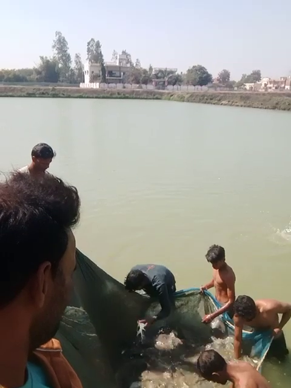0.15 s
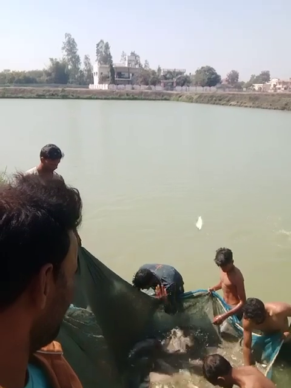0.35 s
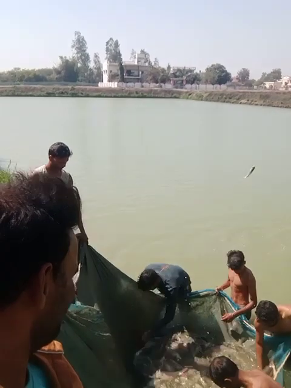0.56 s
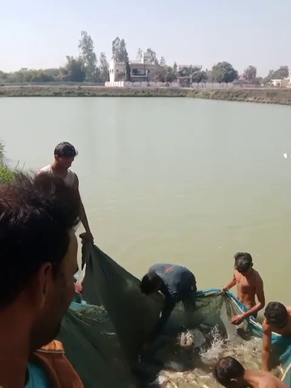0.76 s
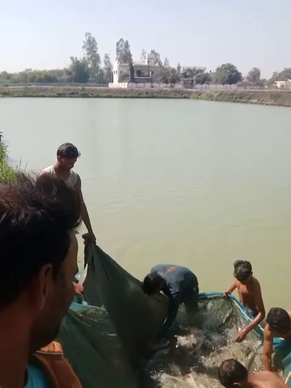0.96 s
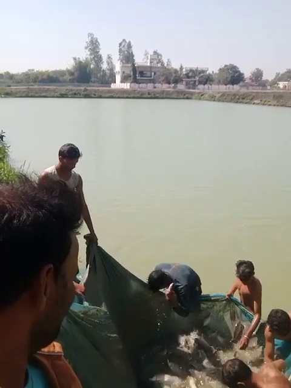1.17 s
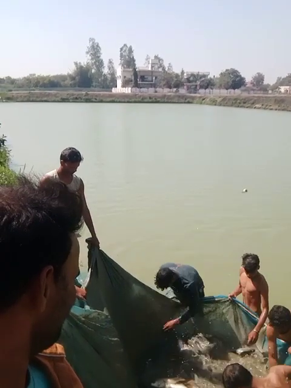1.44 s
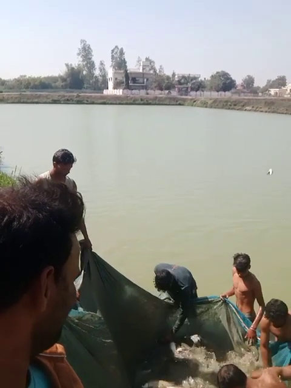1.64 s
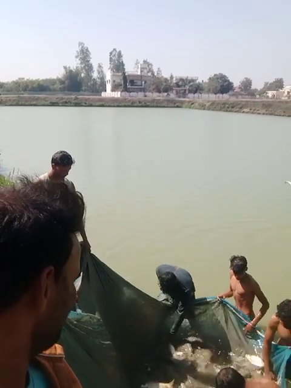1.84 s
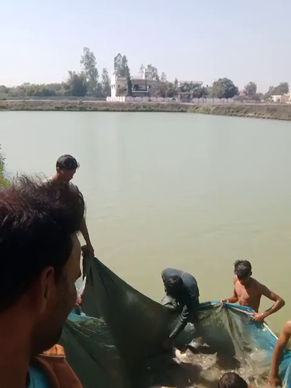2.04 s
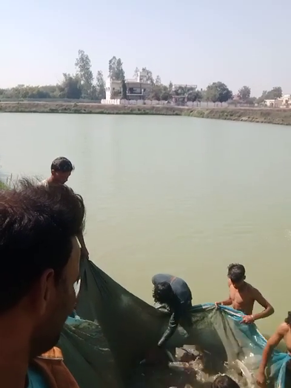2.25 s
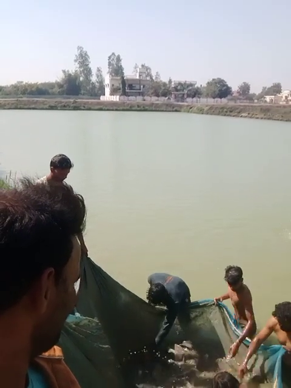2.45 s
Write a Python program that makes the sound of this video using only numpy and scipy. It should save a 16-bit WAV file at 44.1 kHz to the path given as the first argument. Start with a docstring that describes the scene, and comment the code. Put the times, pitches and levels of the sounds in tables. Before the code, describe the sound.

Crowded fish thrash in a net, churning and slapping pond water, with light wind rumbling on the microphone

```python
"""At a pond bank, a crowded mass of fish thrashes in a net while light wind puffs on a phone's microphone.
The churning water is patchy noise plus thousands of tiny ringing drops and bubbles, in four surging bands.
Tail slaps are a crack and a short burst of noise; single bubbles and droplet hits are short rising tones.
The wind is a low lumpy rumble with short low swings, each with a rough edge.
The microphone's colour lifts the water near 1.25 kHz and 15 kHz."""
import sys
import numpy as np
from scipy import signal
from scipy.fft import rfft, irfft, next_fast_len
from scipy.io import wavfile
from scipy.ndimage import uniform_filter1d, map_coordinates

SR = 44100
rng = np.random.default_rng(int(sys.argv[2]) if len(sys.argv) > 2 else 0)


def materialize(psi):
    """Save the field psi as 16-bit PCM at rate SR to the path in sys.argv[1].

    A 1-D psi becomes a single channel; in a 2-D psi each row is a channel.
    """
    bounded = np.clip(np.atleast_2d(psi).T, -1, 1)
    quanta = np.round(bounded * 32767).astype(np.int16)
    wavfile.write(sys.argv[1], SR, quanta)


N = 114660  # length of the scene [samples], 2.6 s


def amp(db):
    """Turn decibels into a gain."""
    return 10 ** (np.asarray(db) / 20)


def unit(x):
    """Scale to an average strength (rms) of 1."""
    return x / np.sqrt(np.mean(x ** 2) + 1e-20)


def along(points, hz):
    """Read a curve of (frequency, value) points, with straight lines on a log frequency axis."""
    f, v = np.transpose(points)
    return np.interp(np.log(hz + 1), np.log(f + 1), v)


def curves(rows):
    """Give one value per sample for each column after the time."""
    seconds, *columns = np.transpose(rows)
    return [np.interp(np.arange(N) / SR, seconds, column) for column in columns]


def wobble(rate):
    """A smooth random curve through `rate` random points a second."""
    points = rng.standard_normal(int(N * rate / SR) + 4)
    return map_coordinates(points, [np.arange(N) * rate / SR])


def coloured(x, db_of):
    """Filter with the loudness curve db_of(Hz), so that nothing sounds before its cause."""
    m = 2 ** 18
    log_gain = np.maximum(db_of(np.fft.rfftfreq(m, 1 / SR)), -110) * np.log(10) / 20
    # Folding the cepstrum (spectrum of the log gain) onto positive time gives a minimum-phase filter
    cepstrum = irfft(log_gain, m)
    cepstrum[1:m // 2] *= 2
    cepstrum[m // 2 + 1:] = 0
    return irfft(rfft(x, m) * np.exp(rfft(cepstrum)), m)[:N]


def bands(x):
    """Give noise the water's colour, split it at 0.8, 1.9 and 6.7 kHz, and scale each part to rms 1."""
    # colour of the water through the microphone: (frequency [Hz], relative level [dB per Hz])
    water_colour = [(150, -50), (300, -24), (450, -24), (630, -8), (1090, -6), (1260, 4), (1420, -6),
                    (2500, -11), (2800, -16), (4200, -17), (4800, -25), (6000, -24), (6600, -42),
                    (7100, -34), (8000, -46), (10500, -44), (13600, -47), (15050, -29), (15420, -30),
                    (15560, -58)]
    m = next_fast_len(N + 8192)
    spectrum = rfft(coloured(x, lambda hz: along(water_colour, hz)), m)
    f = np.fft.rfftfreq(m, 1 / SR)
    splits = ((800, 4), (1900, 4), (6700, 16))  # (frequency [Hz], steepness)
    # Share of the sound below each split; neighbours are subtracted so the shares add up to 1
    below = [0] + [1 / (1 + (f / split_hz) ** order) for split_hz, order in splits] + [1]
    return [unit(irfft(spectrum * (high - low), m)[:N]) for low, high in zip(below, below[1:])]


def patchy(patchy_db):
    """Wash of water: white noise with small patches of random gain in time and pitch."""
    z = signal.stft(rng.standard_normal(N + 256), nperseg=256)[2]
    field = uniform_filter1d(rng.standard_normal(z.shape), size=8, axis=0)
    field = uniform_filter1d(field, size=3, axis=1)
    return unit(signal.istft(z * amp(patchy_db * unit(field)), nperseg=256)[1][:N])


def grains(count, mid_hz, octaves, cycles, spread_db, rise):
    """Droplets and small bubbles: rising sine tones that die away, at random moments."""
    u, g = rng.random((count, 2)), rng.standard_normal(count)
    hz = np.clip(mid_hz * 2 ** (octaves * g), 450, 16000)[:, None]
    t = np.arange(1500) / SR
    age = t * hz / cycles
    wave = np.sin(2 * np.pi * hz * t * (1 + rise * np.minimum(age, 2) / 2))
    wave *= np.exp(-2 * age) * (1 - np.exp(-8 * age))
    wave *= amp(-spread_db * np.log(1 - u[:, 1:])) * np.sqrt(hz)
    at = (u[:, :1] * N).astype(int) + np.arange(len(t))
    return unit(np.bincount(at.ravel(), wave.ravel(), N + len(t))[:N])


def churn():
    """The steady thrashing: wash, droplets and small bubbles mixed in four bands that surge together."""
    # loudness of the water: (time [s], slosh under 0.8 kHz [dB], churn to 1.9 kHz [dB],
    # spray to 6.7 kHz [dB], finest spray above [dB])
    water_levels = [(0, -37.5, -55.5, -47, -72.5), (.1, -63.5, -48.5, -54.5, -71),
                    (.4, -60, -47, -54, -75.5), (0.622, -66, -52.5, -59, -77),
                    (0.69, -38.5, -70, -50, -74.5), (.83, -44.5, -39.5, -44, -67),
                    (.9, -38, -53, -40.5, -56.5), (1.041, -45.5, -41, -45.5, -62),
                    (1.139, -54.5, -43.5, -50, -68.5), (1.382, -52.5, -49, -51.5, -73),
                    (1.449, -69, -48, -57.5, -73.5), (1.74, -50, -45.5, -54.5, -76),
                    (1.902, -50, -54.5, -47, -66), (1.979, -63.5, -46, -57, -78),
                    (2.302, -58.5, -53, -64.5, -76.5), (2.401, -62, -51, -51.5, -72.5),
                    (2.6, -54, -48.5, -71, -83)]
    # depth of the shared surging: one value for each band, low to high [dB]
    surge_depths = (1, .7, 1.5, 2.8)
    drops = grains(count=5000, mid_hz=6000, octaves=1.1, cycles=2, spread_db=3.2, rise=.1)
    fizz = grains(count=2600, mid_hz=3000, octaves=1, cycles=14, spread_db=2.6, rise=.05)
    source = patchy(patchy_db=2.2) + amp(-6.5) * drops + amp(-2) * fizz
    surge = .5 * wobble(14.72) + wobble(44.5)
    return sum(amp(level_db) * unit(part * amp(depth_db * surge))
               for part, level_db, depth_db in zip(bands(source), curves(water_levels), surge_depths))


def slaps():
    """Tail slaps: each is a crack and a sudden burst of spray noise that dies quickly."""
    # (time [s], level [dB], body from 0.8 to 1.9 kHz relative to that level [dB])
    slap_list = [(0.0135, -23, -30), (0.0693, -29.5, -6), (0.1148, -36, 2), (0.2007, -45, 13),
                 (0.3089, -30.5, 5.5), (0.6584, -43.5, 13.5), (0.6745, -30, -2), (0.7058, -26, 0),
                 (0.8001, -34, 14.5), (0.8782, -26, 12), (0.9567, -24, -10), (0.9845, -20, -4),
                 (1.063, -18.5, 0), (1.0807, -25, -15), (1.398, -46, 18), (1.461, -41, 15),
                 (1.6944, -49, 25), (1.7617, -33, -23), (1.7874, -26.5, -11), (1.877, -36.5, -14),
                 (2.1474, -49.5, 21.5), (2.232, -36.5, -16), (2.247, -34.5, -12), (2.272, -45.5, 22),
                 (2.3004, -57, 34.5), (2.3537, -38, 18), (2.386, -34.5, 7), (2.487, -43.5, 16.5),
                 (2.572, -39.5, 14.5)]
    attack_s, t60_s = .0006, .045  # time to swell, time to die by 60 dB
    burst_db = -11.5  # burst under the listed level
    slosh_db, spray_db = -17.5, -20  # slosh under the body, finest spray under the coarser spray
    crack = 4.67  # height of the crack, in burst rms
    t = np.arange(SR // 8) / SR
    env, burst = np.zeros((4, N + SR)), rng.standard_normal(N)
    shape = (1 - np.exp(-t / attack_s)) * amp(-60 * t / t60_s)
    for s, db, body_db in slap_list:
        start = round(s * SR)
        band_db = np.array([[body_db + slosh_db], [body_db], [0], [spray_db]])
        env[:, start:start + len(t)] += amp(db + burst_db + band_db) * shape
        # One single tall sample becomes the crack
        burst[round((s + attack_s) * SR)] = -crack
    return (env[:, :N] * bands(burst)).sum(0)


def bubbles_and_droplet_hits():
    """Single bubbles and droplet hits: short ringing tones that climb in pitch and die away."""
    # (time [s], level [dB], start pitch [Hz], life [s], of which at most 0.04 s counts)
    ring_list = [(.712, -28, 762, 0.015), (.83, -24, 560, 0.0094), (.898, -22.5, 935, 0.0085),
                 (1.046, -30, 510, 0.0095), (1.064, -16.5, 1360, 0.0066), (1.282, -33, 756, 0.01),
                 (1.347, -39.5, 670, 0.0104), (1.551, -35.5, 864, 0.019), (1.712, -33, 580, 0.024),
                 (1.788, -36.5, 2740, 0.0054), (1.878, -35, 3000, 0.004), (1.968, -38.5, 2100, .005),
                 (2.085, -35, 829, 0.05), (2.248, -34.5, 2040, 0.005), (2.3, -39.5, 656, 0.03),
                 (2.585, -40.5, 607, 0.026)]
    rise_per_s = 12  # pitch gained each second, in multiples of the start pitch
    out, t = np.zeros(N + SR), np.arange(SR // 8) / SR
    for s, db, hz, life in ring_list:
        age = t / min(life, .04)
        ring = np.sin(2 * np.pi * hz * np.cumsum(1 + rise_per_s * t) / SR)
        ring *= (1 - np.exp(-9 * age)) * np.exp(-2.2 * age * age)
        out[round(s * SR):][:len(t)] += amp(db) * ring
    return out[:N]


def wind():
    """Lumpy rumble, and puffs that swing the membrane for a cycle or two with a rough edge."""
    # steady rumble before the low cut: (time [s], level [dB])
    breeze = [(0, -39), (.17, -42), (.3, -33.5), (.54, -45.5), (.72, -27), (.93, -40), (1.1, -37),
              (1.3, -44.5), (1.38, -60), (1.48, -36), (1.67, -47), (1.75, -42.5), (1.87, -45.5), (2.1, -36),
              (2.3, -36.5), (2.38, -58), (2.6, -54.5)]
    # puffs before the low cut: (time of peak [s], level [dB], pitch [Hz], length [s])
    puff_list = [(0.207, -10.5, 116, 0.0072), (0.232, -27, 131, 0.0096), (0.265, -16.5, 111, 0.0038),
                 (0.278, -20.5, 185, 0.0037), (0.292, -27, 103, 0.023), (0.389, -17, 111, 0.012),
                 (0.41, -23.5, 228, 0.0061), (0.472, -32, 97, 0.011), (0.598, -23, 167, 0.01),
                 (0.615, -23, 127, 0.009), (0.677, -19.5, 154, 0.0036), (0.693, -16.5, 289, 0.0059),
                 (0.704, -10, 97.5, 0.012), (0.725, -18, 100.5, .012), (0.748, -16.5, 157, 0.005),
                 (0.767, -20.5, 119, 0.0026), (0.787, -17.5, 119, 0.0067), (0.809, -23.5, 139.0, 0.004),
                 (0.877, -13, 119, 0.0083), (1.064, -24.5, 100, 0.0083), (1.132, -13.5, 100.4, 0.01),
                 (1.22, -34.5, 131, .01), (1.295, -24.5, 95.5, 0.012), (1.434, -20.5, 110.6, 0.0084),
                 (1.513, -35.5, 119, 0.025), (1.736, -26.5, 114, 0.0086), (2.03, -17, 121, 0.0073),
                 (2.04, -13, 120.4, 0.0076), (2.058, -10, 114, 0.0077), (2.089, -17.5, 156, 0.012),
                 (2.147, -23.5, 128, 0.0044), (2.215, -22, 146, 0.01), (2.239, -26.5, 107, 0.0074),
                 (2.276, -20.5, 106.5, 0.0088), (2.306, -24, 106, 0.014)]
    # colour of the rumble: (frequency [Hz], relative level [dB per Hz])
    rumble_colour = [(25, -52), (60, 3), (105, 6.5), (160, -3.5), (250, -26), (500, -30.5), (900, -97.5)]
    # colour of a puff's rough edge: (frequency [Hz], relative level [dB per Hz])
    edge_colour = [(120, -35.5), (220, 15), (320, -4), (500, -12), (900, -27.5), (2000, -120)]
    edge_db, edge_grows = -19.5, .5  # edge under a puff of -16.5 dB, extra dB for each dB of the puff
    edge_lasts = 1.22  # spread of the edge, in puff lengths
    sag = .15  # how strongly a puff's pitch sinks as it passes
    cut_hz = 45  # the phone cuts the deepest wind

    level_db, = curves(breeze)
    bed = coloured(rng.standard_normal(N), lambda hz: along(rumble_colour, hz))
    out = amp(level_db) * unit(unit(bed) * amp(0.66 * wobble(21.7)))
    edge = unit(coloured(rng.standard_normal(N), lambda hz: along(edge_colour, hz)))
    t = np.arange(N) / SR
    for (s, db, hz, length), turn in zip(puff_list, rng.random((len(puff_list), 1))):
        near = slice(max(round((s - .06) * SR), 0), round((s + .09) * SR))
        since = t[near] - s
        u = since / length
        # A puff swells faster than it fades
        env = amp(db) * np.exp(-np.where(u < 0, 3.2, 1.6) * u * u)
        swing = np.cos(2 * np.pi * (hz * since * (1 - sag * np.tanh(u / 2)) + turn))
        rough = amp(db + edge_db + edge_grows * (db + 16.5)) * np.exp(-(u / edge_lasts) ** 2) * edge[near]
        out[near] += env * swing + rough
    return coloured(out, lambda f: -10 * np.log10(1 + (cut_hz / (f + 1)) ** 6))


def hiss():
    """Very faint steady noise that is duller towards the treble."""
    noise = coloured(rng.standard_normal(N), lambda f: -6 * np.log2(1 + f / 3000))
    return amp(-80) * noise


def scene():
    """One microphone hears it all; a faint smeared copy makes the two channels differ slightly."""
    # left-right difference: (frequency [Hz], gain of the smeared copy [dB])
    side_gain = [(120, -37), (350, -30), (1300, -50), (3000, -26), (12000, -19)]
    mid = churn() + slaps() + bubbles_and_droplet_hits() + wind()
    mid = mid + hiss()
    smear = rng.standard_normal(600) * np.exp(-np.arange(600) / 150)
    smeared = signal.fftconvolve(mid, smear / np.linalg.norm(smear))[:N]
    side = coloured(smeared, lambda hz: along(side_gain, hz))
    return np.array([mid + side, mid - side])


def record(dry):
    """The phone keeps nothing above its band limit."""
    top_hz = 15725
    m = next_fast_len(N + 8192)
    kept = np.fft.rfftfreq(m, 1 / SR) < top_hz
    return irfft(rfft(dry, m) * kept, m)[:, :N]


dry = scene()
out = record(dry)
materialize(out)
```